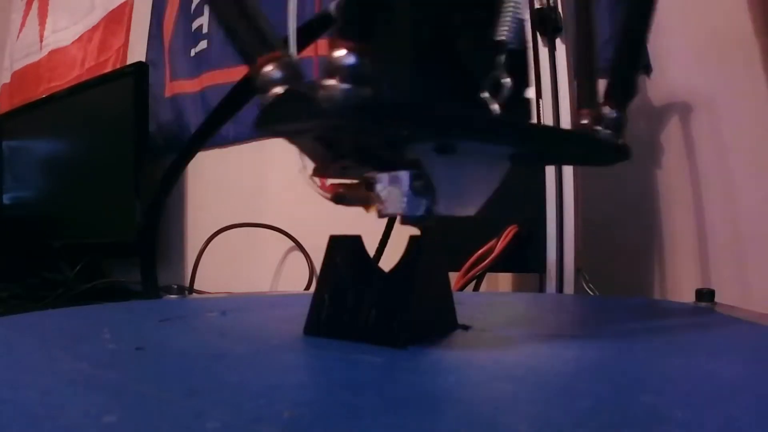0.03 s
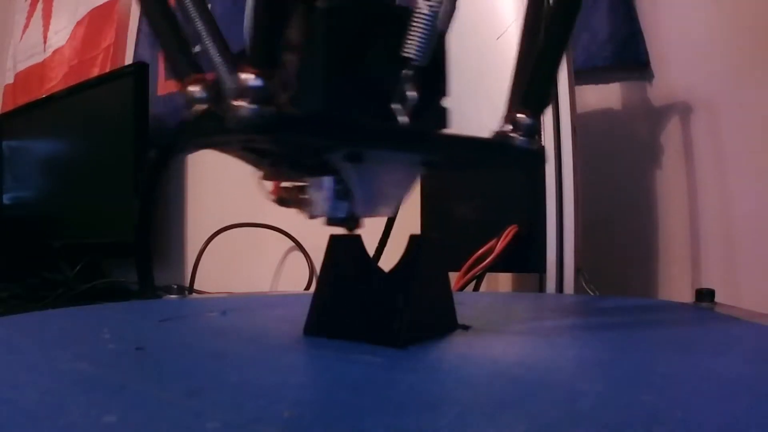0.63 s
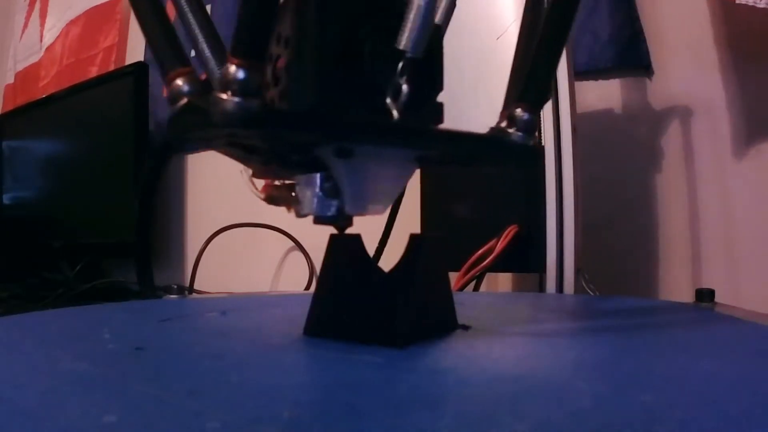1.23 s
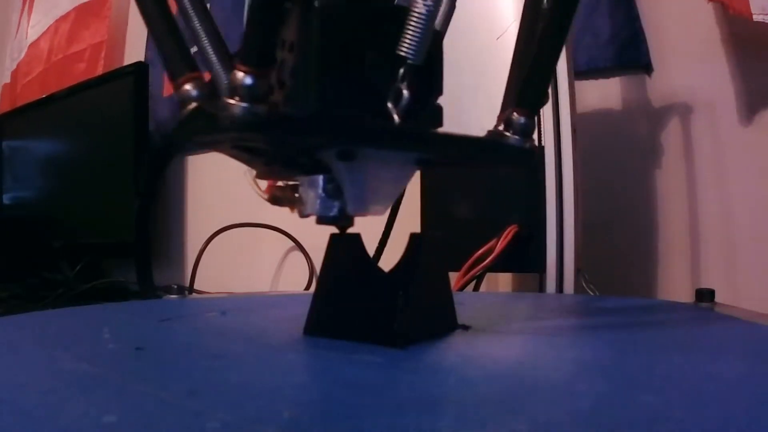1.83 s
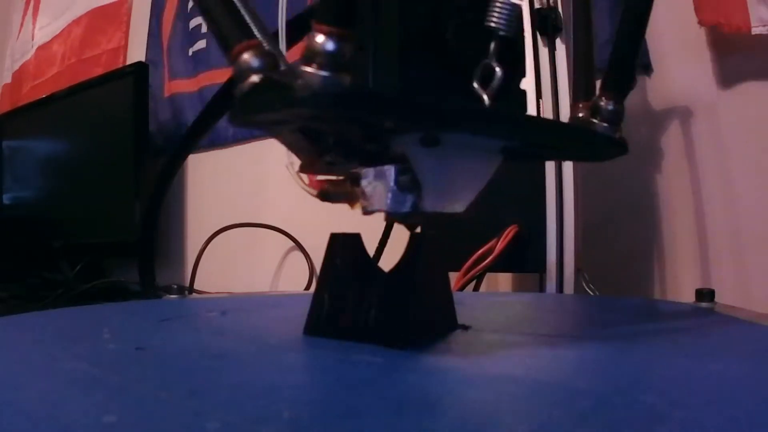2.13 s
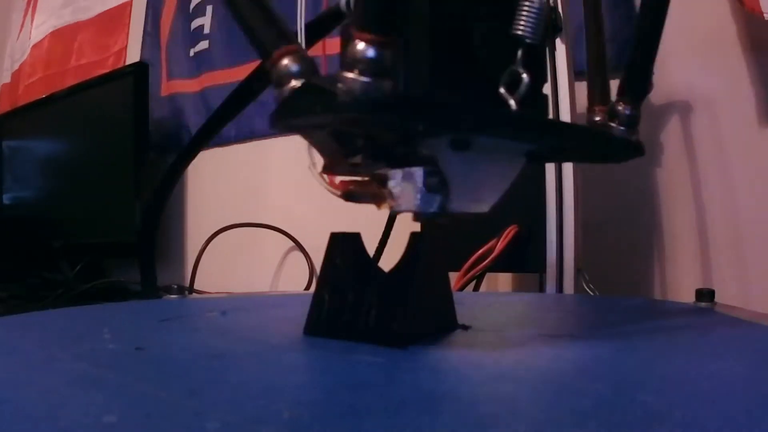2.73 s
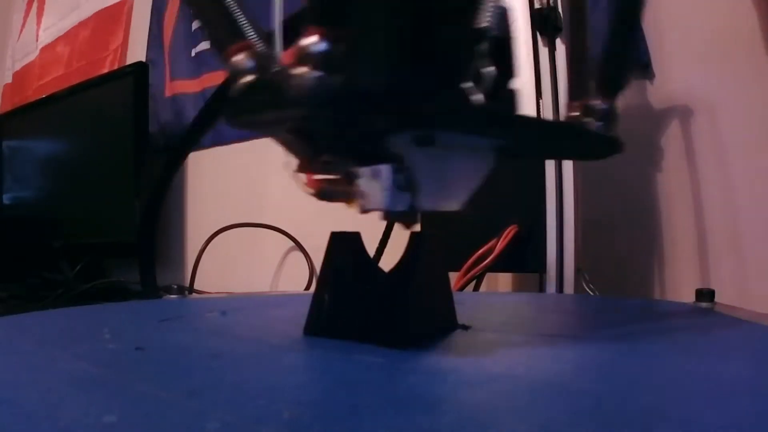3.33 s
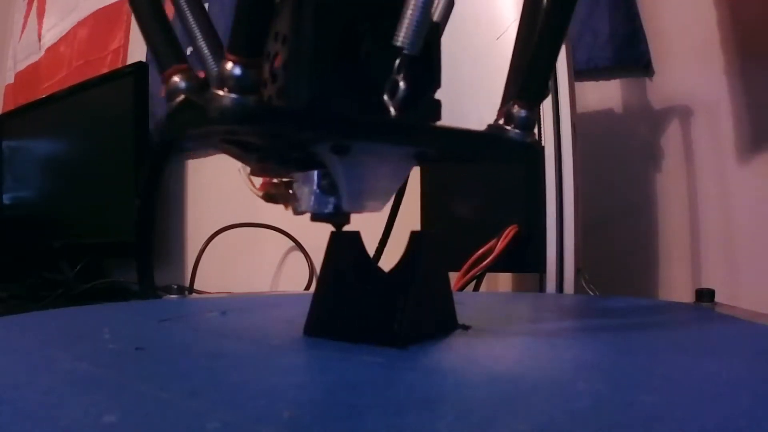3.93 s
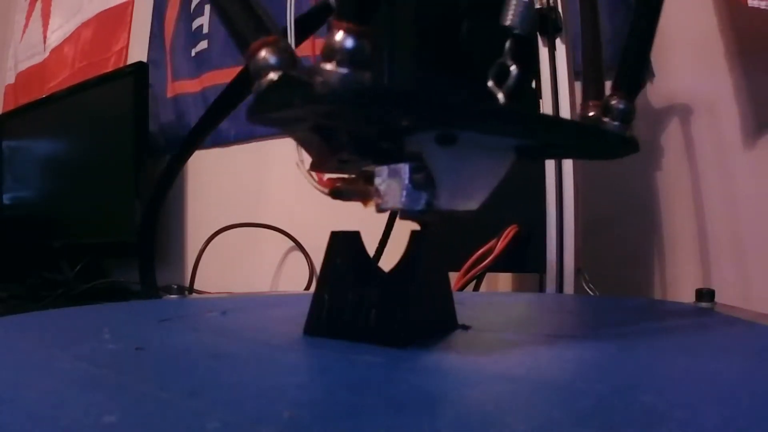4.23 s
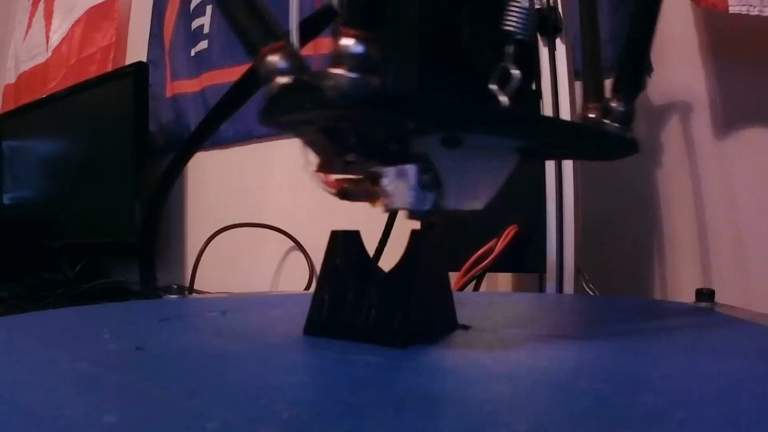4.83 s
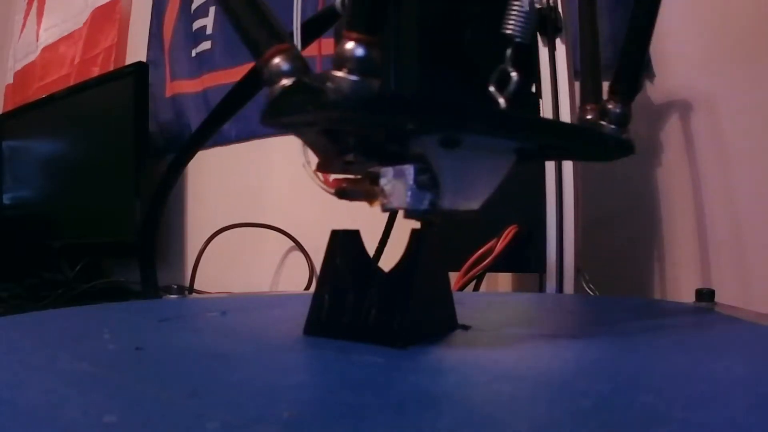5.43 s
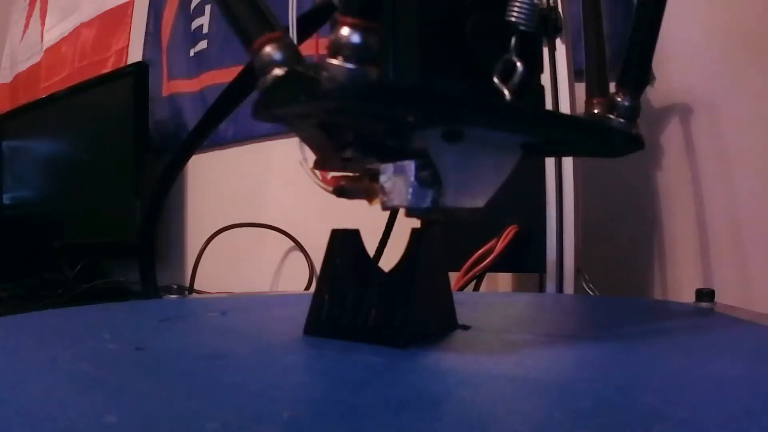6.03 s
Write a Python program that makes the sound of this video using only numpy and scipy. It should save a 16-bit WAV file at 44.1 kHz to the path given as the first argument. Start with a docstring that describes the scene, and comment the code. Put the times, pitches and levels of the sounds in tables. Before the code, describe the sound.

A 3D printer works without stopping for about six seconds, close and in mono, with a thin, bright sound and almost no bass. Cooling fans blow and hum steadily beneath a very high, slightly trembling whistle. From the start, the stepper motors repeat one pattern about three times a second: a tiny scratchy squeak, a rough whine that surges twice, a higher wavering whine, then a short rasp. Fine fizzing, belt buzz and a light frame rattle pulse with these moves. The motor whines step slightly lower roughly every 1.3 seconds. The rattle briefly hardens near 0.6, 2.3, 3.6 and 4.9 seconds. Around 0.4, 1.1, 2.4, 2.9 and 5.6 seconds, most of the noise dips for a split second while the pure tones carry on. The machine is still running at the end.

```python
"""Fans hum and blow under a thin driver whistle as a delta 3D printer circles a small part, close, in mono.
Each lap, about three a second, is the same round of moves: a squeak at the seam, a short side, a long
side, the way back. The stepper motors sing at their step rates, lower every few laps; their steps fizz,
the frame rattles and the belts buzz. Now and then most of the noise dips briefly and the tones stay."""
import sys
import numpy as np
from scipy import signal
from scipy.fft import rfft, irfft, next_fast_len
from scipy.io import wavfile
from scipy.ndimage import uniform_filter1d

SR = 44100
rng = np.random.default_rng(int(sys.argv[2]) if len(sys.argv) > 2 else 0)


def unload_wav(signal):
    """Save mono or channel-first audio to the path in sys.argv[1] as 16-bit WAV at rate SR, clipped to [-1, 1]."""
    wavfile.write(
        sys.argv[1],
        SR,
        np.round(np.clip(np.atleast_2d(signal).T, -1, 1) * 32767).astype(np.int16),
    )


N = 268877
TIME_S = np.arange(N) / SR


def from_db(db):
    """Decibels to gain."""
    return 10 ** (np.asarray(db) / 20)


def unit_rms(x):
    """Scale to rms 1."""
    return x / np.sqrt(np.mean(x ** 2) + 1e-20)


def drift(rate_hz):
    """Smooth, soft-limited random wander; rms 1."""
    pole = np.exp(-8 * np.pi * abs(rate_hz) / SR)
    slow = signal.lfilter([1], [1, -2 * pole, pole * pole], rng.standard_normal(N // 4 + 8002))[8000:]
    limited = unit_rms(np.tanh(unit_rms(slow) / 2))
    return np.interp(np.arange(N) / 4, np.arange(len(slow)), limited)


def coloured(x, spectrum):
    """Shape x by a spectrum; rms 1."""
    hz, db = np.transpose(spectrum)
    size = next_fast_len(N, real=True)
    bins_hz = np.maximum(np.fft.rfftfreq(size, 1 / SR), 1)
    gain = from_db(np.interp(np.log(bins_hz), np.log(hz), db))
    return unit_rms(irfft(rfft(x, size) * gain, size)[:N])


def resonate(x, modes):
    """Parallel resonances, band-limited: small parts radiate little below their lowest mode; rms 1."""
    ringing = 0
    for k, (hz, width_hz, db) in enumerate(modes):
        radius = np.exp(-np.pi * width_hz / SR)
        feedback = [1, -2 * radius * np.cos(2 * np.pi * hz / SR), radius ** 2]
        ringing += (-1) ** k * from_db(db) * (1 - radius ** 2) * signal.lfilter([1, 0, -1], feedback, x)
    edges_hz = [modes[0][0] * .8, min(modes[-1][0] * 1.3, SR * .45)]
    return unit_rms(signal.sosfilt(signal.butter(4, edges_hz, "band", fs=SR, output="sos"), ringing))


def tone(hz, width_hz):
    """Sine whose wandering pitch widens its line; rms 1."""
    wander_hz = width_hz * drift(2 * abs(width_hz) + 1) / 2
    return np.sqrt(2) * np.sin(2 * np.pi * np.cumsum(hz + wander_hz) / SR)


def rough_tone(hz, width_hz):
    """Whine fluttering in strength and phase; rms 1."""
    phase = 2 * np.pi * np.cumsum(hz + np.zeros(N)) / SR
    return drift(width_hz) * np.sin(phase) + drift(width_hz) * np.cos(phase)


def warble(hz, width_hz, blur_db):
    """Rough whine inside a blur three times as wide; rms 1."""
    return unit_rms(rough_tone(hz, width_hz) + from_db(blur_db) * rough_tone(hz, 3 * width_hz))


def during(clock_s, start_s, end_s, ramp_s=.0013):
    """Gate for one move, with acceleration ramps."""
    return np.clip(np.minimum(clock_s - start_s, end_s - clock_s) / ramp_s + .5, 0, 1)


def swells_db(rows):
    """Sum of bell-shaped level changes."""
    return sum(db * np.exp(-2 * ((TIME_S - at_s) / length_s) ** 2) for at_s, length_s, db in rows)


# laps: (squeak time [s], relative squeak level [dB], relative hop level [dB], wait after squeak [s])
LAPS = [(0.096, -31.5, -28.5, 0.0026), (0.428, -32, -24.5, 0), (0.766, -30, -34, 0.011),
        (1.105, -32, -26.5, 0), (1.434, -29, -31.5, 0.0042), (1.762, -29.5, -25.5, 0.00055),
        (2.087, -31.5, -29, 0.00095), (2.413, -28, -25, 0), (2.741, -31.5, -26, 0.011),
        (3.066, -29, -28, 0.0034), (3.399, -32, -33, 0.0087), (3.726, -31.5, -34, 0.012),
        (4.052, -30.5, -29.5, 0.003), (4.375, -32, -26.5, 0.00051), (4.694, -29.5, -27.5, 0.00051),
        (5.012, -29.5, -26.5, 0.00039), (5.332, -30.5, -24, 0), (5.648, -27.5, -26.5, 0.0013),
        (5.964, -29, -24.5, 0)]
def laps(lead_s=.054, first_step_hz=15000, slowing_hz=579, laps_per_speed=4):
    """Per sample: time from the lap's squeak, the same less the head's wait, step rate, seam levels."""
    rows = np.array(LAPS)
    lap = np.maximum(np.searchsorted(rows[:, 0] - lead_s, TIME_S) - 1, 0)
    squeak_s, squeak_db, hop_db, wait_s = rows[lap].T
    clock_s = TIME_S - squeak_s
    travel_s = clock_s - np.clip(clock_s, 0, np.maximum(wait_s, 0))
    step_hz = first_step_hz - slowing_hz * (np.maximum(lap - 1, 0) // laps_per_speed)
    return clock_s, travel_s, step_hz, hop_db, squeak_db


# moves of a lap: braking, hop, pause, short side, long side, smooth long side, way back
# (start from squeak [s], low rattle gain [dB], high rattle gain [dB], fizz gain [dB], belt gain [dB])
MOVES = [(-.047, -2.5, -6, -4, 5.5), (-.031, -1, -2, 4, -2), (-.012, -.5, -7, -4.5, 4.5),
         (.005, -2.5, -3, 2, 2.5), (.068, -4, -3.5, -2, 4.5), (.102, -5, -2, -2, 6),
         (.163, -2.14, -1.5, 4, 5)]
def move_gains(travel_s):
    """Smoothed gains of the current move; the last move runs on into the next lap."""
    rows = np.array(MOVES)
    move = np.searchsorted(np.sort(rows[:, 0]), travel_s) - 1
    return uniform_filter1d(from_db(rows[move, 1:]), size=180, axis=0).T


# airflow spectrum: (frequency [Hz], relative density [dB])
AIR_SPECTRUM = [(25, -24.5), (100, -27), (350, -24.5), (450, -21.5), (620, -20.5), (820, -8.5), (980, -9),
                (1110, 3), (1420, -1), (2700, -0.5), (5000, -8.5), (8000, -8.5), (12500, -7),
                (16000, -14.5)]
def fan_air(level_db=-41.5):
    """Broad rush of air from the cooling fans."""
    return from_db(level_db) * coloured(rng.standard_normal(N), AIR_SPECTRUM)


# fan tones: (frequency [Hz], level [dB], width [Hz])
FAN_TONES = [(622, -75, 10), (960, -59.7, 1), (1238, -50.8, 1.5), (1336, -68, 2), (2109, -58, 5),
             (2880, -62, 2), (3232, -62, 4), (3714, -63, 5), (4943, -66, 6), (5050, -69, 8)]
def fan_hum():
    """Steady tones of the turning fans."""
    return sum(from_db(db) * tone(hz, width_hz) for hz, db, width_hz in FAN_TONES)


def driver_whistle():
    """The current choppers whistle at a pitch that trembles with the load."""
    pitch_hz = 11145 + 18 * drift(35)
    return from_db(-50.5 + 2 * drift(25)) * tone(pitch_hz, width_hz=5.7)


# direct step spectrum: (frequency [Hz], relative density [dB])
FIZZ_SPECTRUM = [(1000, -16.5), (2600, -5.5), (3400, -2.5), (4500, -2.5), (5000, -8), (6900, -10.5),
                 (8400, 1.5), (9400, -2), (11000, 3), (11350, -6), (12200, -13.5), (15800, -5.5)]
# motor housing modes: (frequency [Hz], width [Hz], relative level [dB])
HOUSING_MODES = [(7380, 220, -3.5), (8660, 320, 1), (10100, 480, -5), (10900, 510, -5), (11700, 180, -2),
                 (12730, 190, -3.5), (13750, 250, -17), (15200, 220, -10)]
def step_fizz(ticks_per_s=2600, spread_db=.5, clump_db=2, hiss_db=-3):
    """Uneven motor steps: dense ticks and hiss in clumps, with the housings ringing along."""
    sizes = from_db(spread_db * np.minimum(rng.exponential(1, N), 4)) * rng.choice([-1, 1], N)
    ticks = unit_rms(sizes * (rng.random(N) < ticks_per_s / SR))
    clumps = from_db(clump_db * drift(130))
    hiss = from_db(hiss_db) * rng.standard_normal(N)
    direct = coloured(clumps * (ticks + hiss), FIZZ_SPECTRUM)
    ringing = resonate(clumps * rng.standard_normal(N), HOUSING_MODES)
    return from_db(-38) * direct + from_db(-47) * ringing


# frame modes, two groups: (frequency [Hz], width [Hz], relative level [dB])
LOW_FRAME_MODES = [(1559, 81, -2.5), (1789, 84, 6.5), (1970, 87, 1.5)]
HIGH_FRAME_MODES = [(2117, 92, -0.5), (2212, 70, 1.1), (2356, 99, 1.5)]
# harder rattles: (time [s], length [s], rise [dB])
HARD_RATTLES = [(.10, .04, 3), (.63, 0.047, 5), (2.31, 0.076, 5.5), (2.68, .03, 2.5), (3.63, 0.09, 3.5),
                (4.33, .04, 3.5), (4.90, 0.023, 4.5)]
def frame_rattle(low_gain, high_gain, dip, chatter_hz=72.9, high_share=.27):
    """The arms' joints chatter into the frame modes; the low group rings through the dips."""
    rise_db = swells_db(HARD_RATTLES)
    chatter = from_db(drift(46) + tone(chatter_hz, width_hz=14) / np.sqrt(2))
    low = resonate(low_gain * chatter * rng.standard_normal(N), LOW_FRAME_MODES)
    high = resonate(high_gain * chatter * rng.standard_normal(N), HIGH_FRAME_MODES)
    return from_db(-39 + rise_db) * low + dip * from_db(-43 + high_share * rise_db) * high


# belt modes: (frequency [Hz], width [Hz], relative level [dB])
BELT_MODES = [(3200, 440, -2), (3490, 340, -5.5), (3870, 410, -10), (5490, 163, 4.5), (6434, 320, 0),
              (7480, 93, 1)]
def belt_buzz(belt_gain, level_db=-43):
    """Each move shakes the belts' resonances with fluttering noise."""
    flutter = from_db(2.75 * drift(86))
    return from_db(level_db) * resonate(belt_gain * flutter * rng.standard_normal(N), BELT_MODES)


def belt_song(travel_s, belt_gain):
    """The belts sing in high snatches, most on the long side, and on a lower note along both sides."""
    snatches = from_db(-54 + 6 * during(travel_s, .112, .146)) * np.maximum(drift(30), 0)
    high = snatches * tone(5540 + 95 * drift(25), width_hz=70)
    low = from_db(-53.5 + 3 * drift(20)) * tone(4330 + 100 * drift(12), width_hz=50)
    return belt_gain * high + during(travel_s, .016, .165) * low


MID_STEP_HZ = 14000
def way_back(travel_s, step_hz):
    """A motor rasps back to the seam, lower and louder as the step rate drops."""
    moving = 1 - during(travel_s, -.077, .14)
    level_db = -50 - .003 * (step_hz - MID_STEP_HZ)
    return from_db(level_db) * moving * rough_tone(.66 * step_hz, width_hz=230)


def seam(clock_s, hop_db, squeak_db, dip):
    """The head passes the seam: a faint peep, a scratchy hop with its octave, a squeak."""
    peep = from_db(-47.5) * during(clock_s, -.04, -.019) * tone(5770, width_hz=39)
    low = from_db(-11) * warble(4200, width_hz=90, blur_db=0)
    octave = tone(8500, width_hz=337) * from_db(3.3 * drift(250))
    hop = from_db(hop_db - 4) * during(clock_s, -.023, -.012, ramp_s=.0039) * (low + octave)
    scratch = from_db(-40) * during(clock_s, -.024, -.006, ramp_s=.005) * rough_tone(3300, width_hz=670)
    squeak_gain = from_db(squeak_db - 2.5 + 1.9 * drift(90))
    squeak = squeak_gain * during(clock_s, -.0059, .0056, ramp_s=.0061) * tone(3822, width_hz=45)
    return peep + hop + dip * scratch + squeak


def short_side(travel_s, step_hz, first_surge_s=.0135, period_s=.033):
    """A rough motor whine surges twice as the carriages change speed."""
    surge = np.cos(2 * np.pi * (travel_s - first_surge_s) / period_s)
    whine = rough_tone(step_hz * (.685 + .00896 * surge), width_hz=610)
    return from_db(-39 + 6.8 * surge) * during(travel_s, .0054, .075) * whine


def cogging(travel_s):
    """A cogging note glides up and down as the carriages change speed."""
    glide = tone(2230 + 100 * drift(11), width_hz=4.9)
    return from_db(-47.5 + 3.5 * drift(8.8)) * during(travel_s, .014, .222, ramp_s=.019) * glide


def long_side(travel_s, step_hz, crest_s=.078, period_s=.047):
    """One motor swings round the step rate; a second, at about half speed, rises as the first falls."""
    swing = np.cos(2 * np.pi * (travel_s - crest_s) / period_s)
    fast = warble(step_hz - 130 * swing + 170 * drift(30), width_hz=180, blur_db=-3)
    slow = warble(step_hz * (.515 + .012 * swing), width_hz=230, blur_db=-1)
    slow_db = -43 + 5.2 * swing + .0043 * (step_hz - MID_STEP_HZ)
    return during(travel_s, .0714, .1604) * (from_db(-41.5) * fast + from_db(slow_db) * slow)


# dips in the noise: (time [s], length [s], gain [dB])
NOISE_DIPS = [(.407, .013, -19), (1.091, .013, -19), (2.391, .013, -22), (2.925, .011, -18),
              (5.635, .013, -19), (5.996, .010, -16)]
def noise_dips():
    """Gain that sinks for a few hundredths of a second now and then."""
    return from_db(swells_db(NOISE_DIPS))


# partials heard in the dips: (frequency [Hz], level [dB])
DIP_PARTIALS = [(4210, -40), (5448, -45), (8414, -40), (10734, -48)]
def dip_partials(dip):
    """Pure partials of wandering strength fill in while the noise dips."""
    return (1 - dip) * sum(from_db(db + 3.8 * drift(6.2)) * tone(hz, 14) for hz, db in DIP_PARTIALS)


def scene(bass_cut_hz=580):
    """Motors, frame, belts and fans, heard from one point."""
    clock_s, travel_s, step_hz, hop_db, squeak_db = laps()
    low_gain, high_gain, fizz_gain, belt_gain = move_gains(travel_s)
    dip = noise_dips()
    motors = short_side(travel_s, step_hz) + long_side(travel_s, step_hz) + way_back(travel_s, step_hz)
    noise = motors + fizz_gain * step_fizz() + belt_buzz(belt_gain)
    air = fan_air()
    notes = fan_hum() + driver_whistle() + seam(clock_s, hop_db, squeak_db, dip)
    notes += cogging(travel_s) + belt_song(travel_s, belt_gain) + dip_partials(dip)
    machine = notes + dip * noise + frame_rattle(low_gain, high_gain, dip)
    # small parts radiate no bass; only the fans' air reaches that low
    highpass = signal.butter(4, bass_cut_hz, "high", fs=SR, output="sos")
    mono = signal.sosfilt(highpass, machine) + dip * air
    return np.array([mono, mono])


def record(dry):
    """Steep low-pass on the top treble."""
    cutoff_hz = 15700
    return signal.sosfilt(signal.ellip(12, .1, 80, cutoff_hz, fs=SR, output="sos"), dry)


dry = scene()
out = record(dry)
unload_wav(out)
```